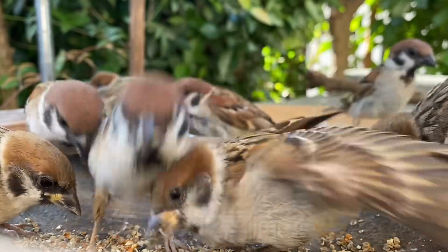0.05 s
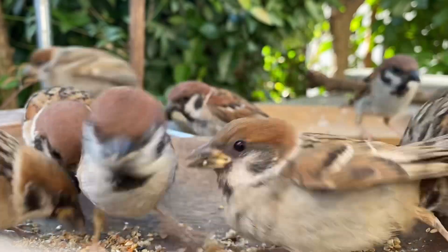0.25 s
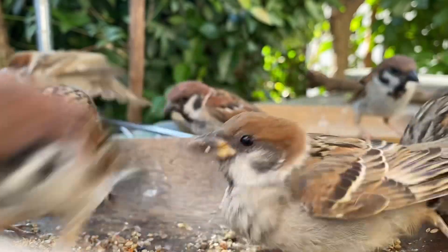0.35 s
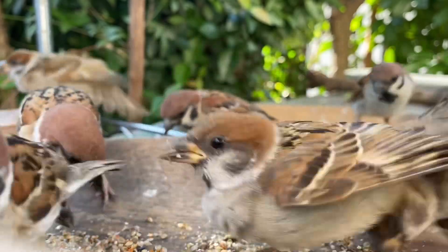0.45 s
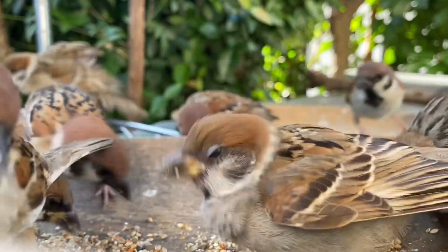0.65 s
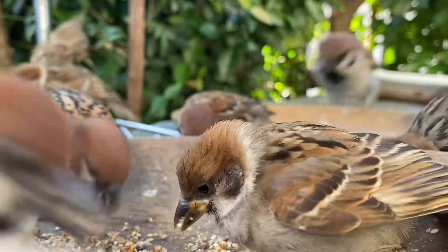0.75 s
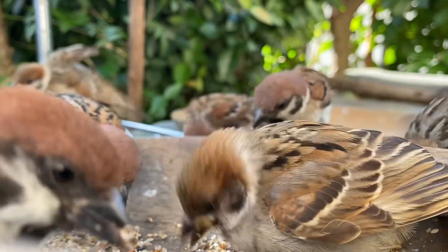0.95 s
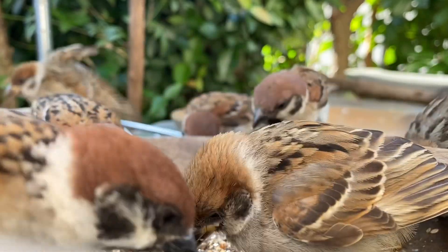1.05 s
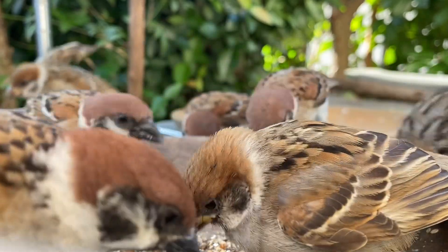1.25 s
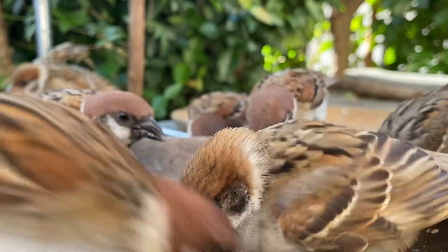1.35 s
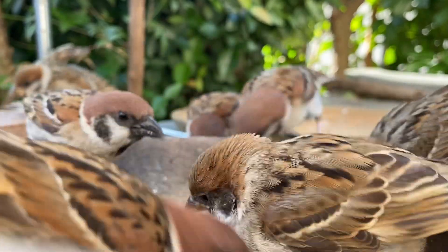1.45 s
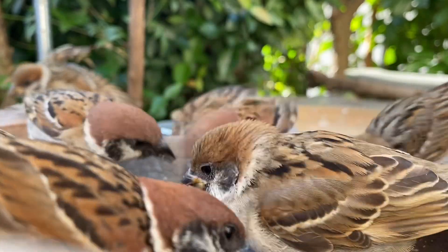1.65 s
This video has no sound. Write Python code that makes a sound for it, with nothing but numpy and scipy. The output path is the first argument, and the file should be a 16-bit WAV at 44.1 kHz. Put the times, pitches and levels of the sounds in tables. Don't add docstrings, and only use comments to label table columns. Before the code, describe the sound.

Two high, sharp sparrow chirps, close and to the left: a loud, fast-warbled one at 0.2-0.3 seconds, then a softer, raspy one at 0.38-0.5. Light husk ticks and soft pecks precede them. Afterwards, beak knocks at 0.83, 1.18 and 1.4, scattered seed clicks and faint low landing thumps. A third chirp starts at about 1.68 and is cut off. Quiet, dry outdoor hum.

```python
import sys
import numpy as np
from scipy import signal
from scipy.fft import rfft, irfft
from scipy.io import wavfile
from scipy.ndimage import uniform_filter1d

SR = 44100
rng = np.random.default_rng(int(sys.argv[2]) if len(sys.argv) > 2 else 0)


def dump(signal):
    limited = np.clip(np.atleast_2d(signal).T, -1, 1)
    pcm = np.round(limited * 32767).astype(np.int16)
    wavfile.write(sys.argv[1], SR, pcm)


def amplitude_ratio(level_db):
    exponent = np.asarray(level_db, float) / 20
    return 10 ** exponent


N = 74970

# frequency_hz, density_db
HUM_SPECTRUM = [(55, -0.5), (110, -5), (300, -11), (900, -14.5), (4500, -21.5), (9000, -33.5),
                (15000, -42.5)]
# frequency_hz, correlation (-1 to 1)
HUM_LIKENESS = [(60, 0.86), (200, 0.62), (400, -0.23), (650, -0.067), (1650, -0.53), (5000, 0.22)]
# start_s, peak_db, pitch_hz, t60_s
HOPS = [
    (0.028, -40.5, 55, 0.32),
    (0.914, -42, 193, 0.041),
    (0.86, -48.5, 106.3, 0.7),
    (1.104, -43, 128, 0.16),
    (1.112, -40, 546, 0.061),
    (1.18, -43, 102, 0.76),
    (1.411, -36, 161, 0.11),
    (1.418, -37.5, 104.8, 0.38),
    (1.5, -45.5, 104.8, 0.45),
]
# start_s, peak_db, pitch_hz
HUSK_TICKS = [(.014, -36.5, 7800), (.022, -36.5, 5400), (0.039, -36.5, 5330), (.057, -37.5, 3670),
              (.057, -43, 11500), (.0857, -41, 4440), (0.1006, -39.5, 9200), (0.1263, -44, 7950),
              (0.168, -35, 3050), (.173, -33, 2920), (0.353, -49, 8700), (.5576, -67, 13000),
              (0.5936, -40, 15800), (0.595, -41, 10000), (0.7377, -48, 11000), (0.824, -37, 6000),
              (.826, -45.5, 3240), (0.843, -52, 12000), (.917, -36, 1980), (.92, -40, 3400),
              (.924, -44, 4540), (0.981, -50, 12000), (1.2224, -34.5, 5370), (1.249, -41, 6900),
              (1.3698, -42.5, 14700), (1.375, -46, 8900), (1.4, -45.5, 8900), (1.418, -42, 3000),
              (1.519, -50, 14070), (1.538, -45, 6500), (1.629, -38, 5000), (1.629, -48, 12900)]
# start_s, peak_db, pitch_hz
BEAK_KNOCKS = [
    (0.0162, -36.5, 1380),
    (0.04, -37, 1750),
    (0.1708, -34.5, 1560),
    (.209, -33, 1440),
    (0.56, -39, 1800),
    (0.826, -31, 1440),
    (1.1779, -27, 1465),
    (1.3997, -35.5, 1620),
    (1.4179, -26.5, 1430),
]
# pitch_ratio, level_db, t60_s
TRAY_MODES = [
    (1.0, -7.5, 0.0045),
    (1.35, -18, 0.003),
    (2.2, -19, 0.005),
    (4.2, -24.5, 0.003),
]
# frequency_hz, difference_db
PORT_PAN = [(1500, 5.5), (3000, 9), (5500, 2.5), (12000, 0)]
# frequency_hz, lead_rad
PORT_LEAD = [(1000, 0.7), (7400, 0.87), (9000, 1.5)]
# frequency_hz, gain_db
PORT_RESPONSE = [(12300, 1.5), (12900, -9), (15000, 12.5), (15900, 7), (16400, -41.5)]
# delay_s, left_db, right_db
REFLECTIONS = [
    (.0011, -37, -39),
    (.0023, -29.5, -18),
    (.0041, -23.5, -12),
    (.0068, -30, -37),
]
# multiple, level_db
OVERTONES = [(2, -25.5), (3, -39)]
# frequency_hz, gain_db
BEAK_COLOUR = [(6000, 3.5), (7600, -7.5), (9200, -17), (11500, 10.5), (12800, -22)]

# time_s, pitch_hz, level_db
LOW_ARCH = [(.2305, 2870, -26.5), (.2335, 3495, -16.5), (.235, 3960, -26.5), (.238, 4710, -10.5),
            (.241, 5030, -19.5), (.2432, 5030, -14.5), (.2455, 4620, -20), (.2485, 4020, -21.5),
            (.252, 3230, -25)]
# time_s, pitch_hz, level_db
HIGH_ARCH = [(0.2376, 5530, -38), (.241, 5920, -17.5), (0.2455, 5930, -16.5), (0.2453, 5770, -19.5),
             (.247, 4880, -10.5), (0.2482, 4580, -23), (0.25, 4320, -14.5), (0.251, 4100, -34)]
# time_s, pitch_hz, level_db
HUMP = [(0.2519, 3140, -37), (0.254, 3270, -18), (0.2543, 3870, -19), (0.255, 4500, -16), (.258, 4640, -8),
        (0.2597, 4350, -13.5), (0.26, 3640, -19), (0.2644, 3190, -24.5), (0.2665, 3200, -32)]
# time_s, pitch_hz, level_db
WARBLE = [(0.2647, 3190, -25), (0.266, 3470, -19.5), (0.2671, 4000, -16), (0.269, 4090, -12.5),
          (0.2699, 3964, -11.5), (0.2716, 3280, -29), (0.2735, 3460, -19), (.2745, 4060, -20),
          (0.2761, 3750, -24)]
# time_s, pitch_hz, level_db
GLIDE = [(0.2765, 3800, -12), (0.278, 3400, -15), (0.2797, 3340, -23.5), (0.284, 3230, -16),
         (0.288, 3100, -22), (0.287, 3050, -41)]
# time_s, pitch_hz, level_db
SAG = [(0.2876, 2770, -27), (0.29, 2940, -30), (0.294, 2880, -33.5), (0.3002, 2820, -31),
       (0.3028, 2520, -37), (0.305, 2400, -26.5), (0.3055, 2300, -39)]
# time_s, pitch_hz, level_db
WIDE_ARCH = [(0.385, 3725, -37.5), (.392, 3940, -33), (0.396, 4070, -26.5), (.3995, 4550, -26.5),
             (0.4039, 5580, -26), (0.4097, 6060, -31.5), (0.4151, 5350, -27), (.419, 4040, -23.5),
             (0.4238, 3420, -28)]
# time_s, pitch_hz, level_db
PLATEAU = [(0.4268, 2900, -43), (.4295, 3260, -27), (0.432, 4060, -24.5), (0.438, 3630, -15),
           (0.4389, 3866, -18), (0.441, 4130, -21), (0.4438, 3640, -19.5), (0.446, 3000, -44)]
# time_s, pitch_hz, level_db
RISE = [(0.457, 3050, -36), (0.4598, 3060, -28), (0.46, 3200, -22), (0.4653, 3230, -21.5),
        (.467, 3410, -25.5), (0.474, 3870, -19), (.477, 4170, -28), (.481, 4330, -22.5), (0.482, 4150, -36)]
# time_s, pitch_hz, level_db
PEEP = [(.494, 4940, -49), (.502, 5020, -44), (0.505, 4880, -48)]
# time_s, pitch_hz, level_db
THIRD_LOW = [(1.684, 2580, -43), (1.688, 2685, -43), (1.6915, 2950, -49), (1.695, 3170, -34.5),
             (1.6975, 3630, -32.5), (1.7, 4400, -31)]
# time_s, pitch_hz, level_db
THIRD_HIGH = [(1.682, 4150, -50), (1.685, 4020, -53), (1.692, 4120, -45.5), (1.697, 4180, -37),
              (1.7, 4680, -29)]
# time_s, centre_hz, level_db
BREATH_1 = [(.204, 4000, -53), (.217, 4400, -37), (.228, 5200, -22), (.234, 6200, -37.5),
            (.25, 5200, -27.5), (.275, 4770, -47.5), (.297, 4600, -31.5), (.311, 4300, -36),
            (.324, 3700, -60)]
# time_s, centre_hz, level_db
BREATH_2 = [(.37, 3700, -65), (0.377, 3670, -43.5), (.4, 4200, -43.5), (.424, 5060, -39),
            (.452, 4000, -34.5), (.47, 5040, -50.5), (0.489, 3820, -37.5), (.503, 4420, -51),
            (.52, 3900, -68)]
# time_s, centre_hz, level_db
BREATH_3 = [(1.659, 5050, -66), (1.665, 5300, -55), (1.676, 3400, -55), (1.689, 3600, -38),
            (1.694, 5300, -40.5), (1.7, 5660, -39)]
# time_s, centre_hz, level_db
CLAW_SCRAPE = [(.914, 2200, -60), (0.921, 2400, -49.5), (0.936, 4200, -69)]
# time_s, centre_hz, level_db
WHEEZE = [(0.365, 7530, -61), (.38, 7200, -50.5), (.393, 7560, -43.5), (0.401, 7420, -49)]


def evened(x):
    return x / np.sqrt(np.mean(x ** 2) + 1e-20)


def read(points, hz):
    f, value = np.transpose(points)
    return np.interp(np.log(hz + 1), np.log(f + 1), value)


def add(mix, start_s, sound):
    part = mix[..., round(start_s * SR):][..., :sound.shape[-1]]
    part += sound[..., :part.shape[-1]]


def chance(t, size):
    x = rng.standard_normal(4000 + len(t) // 4000 * 4000)
    smooth = uniform_filter1d(uniform_filter1d(x, size=size), size=size)
    return evened(smooth)[:len(t)]


def resonate(x, hz, *widths_hz):
    turn = np.exp(2j * np.pi * np.cumsum(hz * np.ones(len(x))) / SR)
    for width in widths_hz:
        r = np.exp(-np.pi * width / SR)
        x = 2 * (turn * signal.lfilter([1 - r], [1, -r], x / turn)).real
    return x


def ports(x):
    x = np.pad(x, (0, 2000), "reflect")
    hz = np.fft.rfftfreq(len(x), 1 / SR)
    half = amplitude_ratio(read(PORT_PAN, hz) / 2) * np.exp(1j * read(PORT_LEAD, hz) / 2)
    z = rfft(x) / abs(half + 1 / half).clip(.7) * 2
    return irfft(np.array([z * half, z / half]), len(x))[:, :N]


def city_hum(level_db=-49.5, patchy_db=2.0, flicker_db=1.3):
    frames, hz = N // 256 + 5, np.fft.rfftfreq(1024, 1 / SR)
    a, b, c, d, patches = rng.standard_normal((frames, 513, 5)).T
    patches = uniform_filter1d(uniform_filter1d(patches, size=16, axis=0), size=10, axis=1)
    flicker = evened(uniform_filter1d(rng.standard_normal(frames), size=2))
    same = np.clip(read(HUM_LIKENESS, hz), -1, 1)[:, None]
    left = a + 1j * b
    right = same * left + np.sqrt(1 - same ** 2) * (c + 1j * d)
    treble = np.clip(hz / 8000, 0, 1.5)[:, None]
    gain_db = read(HUM_SPECTRUM, hz)[:, None] + patchy_db * evened(patches) + flicker_db * flicker * treble
    z = np.array([left, right]) * amplitude_ratio(gain_db)
    return amplitude_ratio(level_db) * evened(signal.istft(z, nperseg=1024, noverlap=768)[1][:, :N])


def hop(peak_db, pitch_hz, t60_s, rise_s=0.0022):
    t = np.arange(0, .3, 1 / SR)
    envelope = amplitude_ratio(peak_db - 60 * t / t60_s) * np.clip(t / rise_s, 0, 1)
    return envelope * np.sin(2 * np.pi * (pitch_hz * t + rng.random()))


def husk_tick(peak_db, pitch_hz, t60_s=0.018, narrow=0.58):
    t = np.arange(0, .015, 1 / SR)
    noise = rng.standard_normal((3, len(t)))
    width = narrow * pitch_hz
    snap = np.array([resonate(w, pitch_hz, width, width) for w in noise[0] + 1.5 * noise[1:]])
    snap = snap * amplitude_ratio(-60 * t / t60_s) * np.clip(t / 0.00064, 0, 1)
    return amplitude_ratio(peak_db) * snap / abs(snap).max()


def beak_knock(peak_db, pitch_hz, rise_s=0.0024, rattle_db=-21, rattle_t60_s=0.057):
    t = np.arange(0, .04, 1 / SR)
    late = np.maximum(t - rise_s, 0)
    ring = 0
    for ratio, db, t60_s in TRAY_MODES:
        phase = 2 * np.pi * pitch_hz * ratio * (t - rise_s) + 1.24 * ratio
        ring = ring + amplitude_ratio(db - 60 * late / t60_s) * np.sin(phase)
    seed = resonate(chance(t, size=1), pitch_hz, 630, 870)
    seed = seed + 0.065 * resonate(chance(t, size=1), 2.3 * pitch_hz, 2300, 2200)
    rattle = amplitude_ratio(rattle_db - 60 * late / rattle_t60_s) * evened(seed)
    blow = (ring + rattle) * np.clip(t / rise_s, 0, 1) ** 0.92
    return amplitude_ratio(peak_db) * blow / abs(blow).max()


def controls(rows):
    s, hz, db = np.transpose(rows)
    t = np.arange(s[0], s[-1], 1 / SR)
    pitch = uniform_filter1d(np.interp(t, s, hz), size=31)
    return t, pitch, amplitude_ratio(uniform_filter1d(np.interp(t, s, db), size=31))


def rasp(rows, width_hz=700, wander=0.078, hiss_db=-15, ratios=(.84, 1.0, 1.17)):
    t, hz, gain = controls(rows)
    streaks = 0
    for ratio in ratios:
        centre = hz * ratio * (1 + wander * chance(t, size=260))
        streaks = streaks + resonate(chance(t, size=1), centre, width_hz, width_hz)
    broad = resonate(chance(t, size=2), hz, 3800, 2100)
    hiss = resonate(chance(t, size=1), 11200, 2300, 2300, 3060)
    hiss = amplitude_ratio(hiss_db - 63.0 * (t - t[0])) * evened(hiss)
    return gain * (evened(streaks) + 0.54 * evened(broad) + hiss)


def whistle(rows, flutter_db=1.72, waver=0.0093, fray_db=4):
    t, hz, gain = controls(rows)
    turn = 2 * np.pi * np.cumsum(hz * (1 + waver * chance(t, size=40))) / SR
    tone = np.sin(turn)
    for k, db in OVERTONES:
        level = amplitude_ratio(db + read(BEAK_COLOUR, k * hz) + fray_db * chance(t, size=24))
        tone = tone + level * np.sin(k * turn + 0.23 * chance(t, size=14))
    edge = np.clip(np.minimum(t - t[0], t[-1] - t) / 0.00092, 0, 1)
    return np.sqrt(2) * tone * gain * edge * amplitude_ratio(flutter_db * chance(t, size=36))


def sparrow():
    voice = np.zeros(N)
    for rows in (LOW_ARCH, HIGH_ARCH, HUMP, WARBLE, GLIDE, SAG, WIDE_ARCH, PLATEAU, RISE, PEEP,
                 THIRD_LOW, THIRD_HIGH):
        add(voice, rows[0][0], whistle(rows))
    for rows in (BREATH_1, BREATH_2, BREATH_3, CLAW_SCRAPE):
        add(voice, rows[0][0], rasp(rows))
    wheeze = rasp(WHEEZE, width_hz=390, wander=0.024, hiss_db=-11.5, ratios=(.93, 1.04))
    add(voice, WHEEZE[0][0], wheeze)
    out = ports(voice)
    for delay_s, left_db, right_db in REFLECTIONS:
        add(out, delay_s, voice * amplitude_ratio(np.array([[left_db], [right_db]])))
    return out


def scene():
    mix, tray = city_hum(), np.zeros(N)
    for start_s, *row in HOPS:
        add(mix, start_s, hop(*row))
    for start_s, *row in HUSK_TICKS:
        add(mix, start_s, husk_tick(*row))
    for start_s, *row in BEAK_KNOCKS:
        add(tray, start_s - .0004, beak_knock(*row))
    return mix + ports(tray) + sparrow()


def low_pass(x):
    return signal.sosfilt(signal.butter(12, 17090, fs=SR, output="sos"), x)


def record(dry):
    power_db = 10 * np.log10(abs(uniform_filter1d((dry ** 2).mean(0), size=900)) + 1e-12)
    fall_db = np.arange(N) * 113.0 / SR
    held_db = np.maximum.accumulate(power_db + fall_db) - fall_db
    over_db = np.maximum(held_db + 36.0, 0)
    low = signal.sosfiltfilt(signal.butter(2, 1500, fs=SR, output="sos"), dry)
    cut = dry - low + low / amplitude_ratio(0.19 * uniform_filter1d(over_db, size=900))
    cut = signal.sosfilt(signal.butter(4, 44, "high", fs=SR, output="sos"), cut)
    cut = np.pad(cut, ((0, 0), (0, N)), "symmetric")
    response = amplitude_ratio(read(PORT_RESPONSE, np.fft.rfftfreq(2 * N, 1 / SR)))
    return low_pass(irfft(rfft(cut) * response)[:, :N])


dry = scene()
out = record(dry)
dump(out)
```